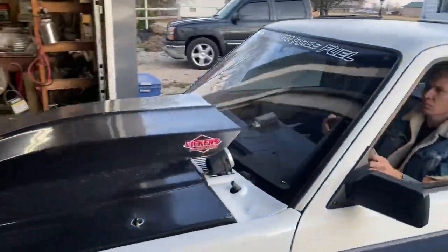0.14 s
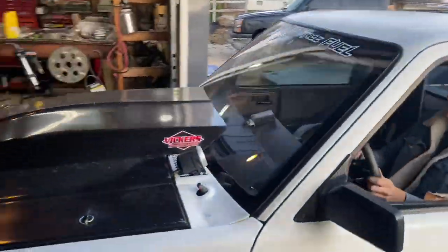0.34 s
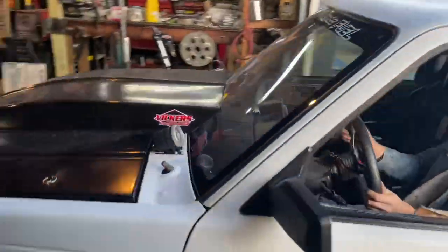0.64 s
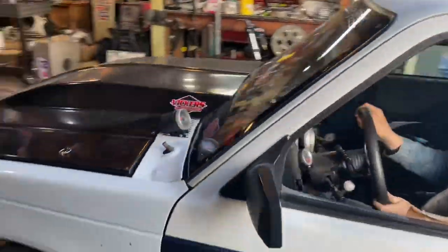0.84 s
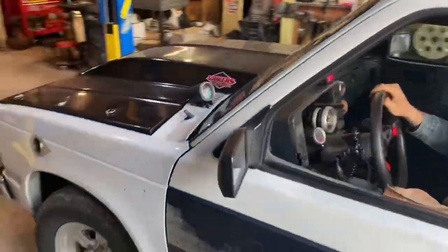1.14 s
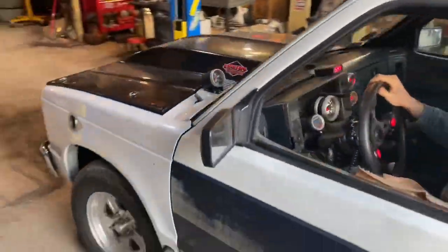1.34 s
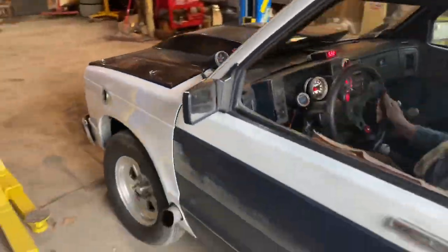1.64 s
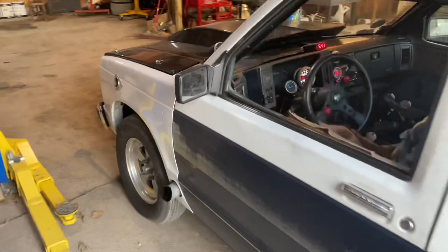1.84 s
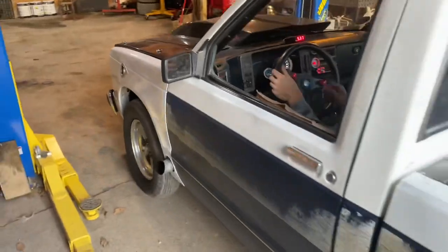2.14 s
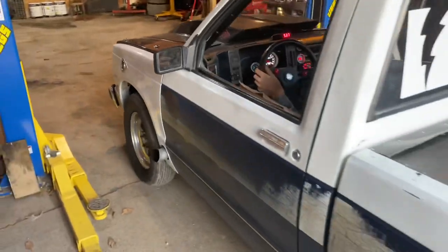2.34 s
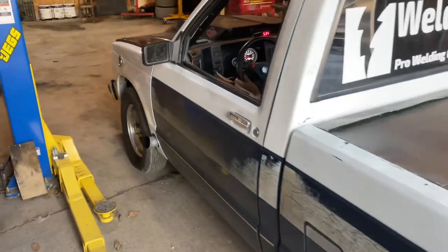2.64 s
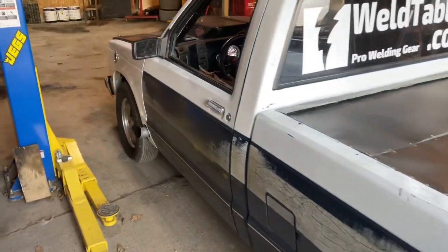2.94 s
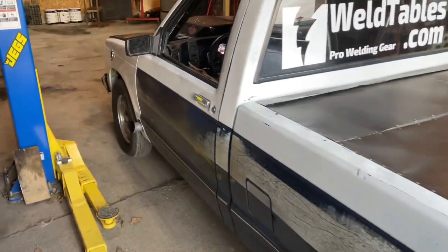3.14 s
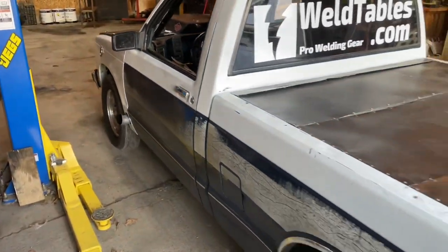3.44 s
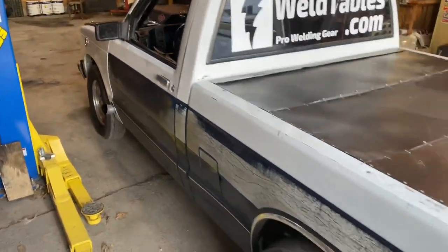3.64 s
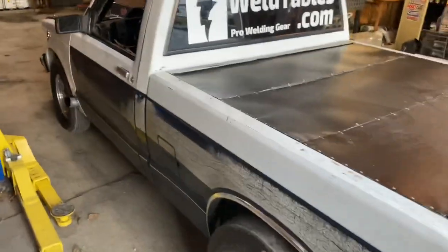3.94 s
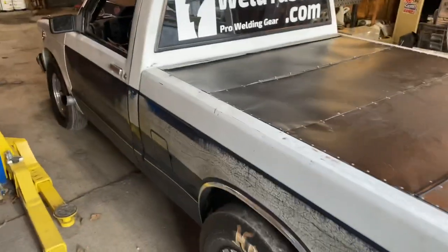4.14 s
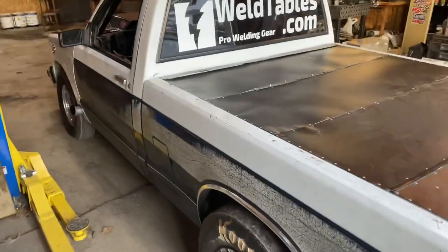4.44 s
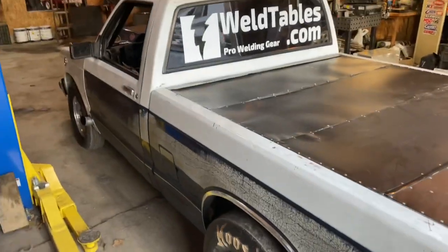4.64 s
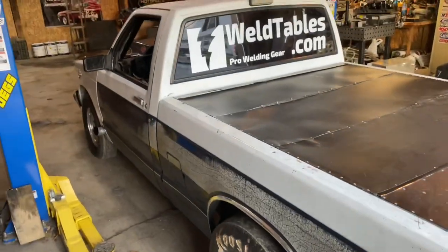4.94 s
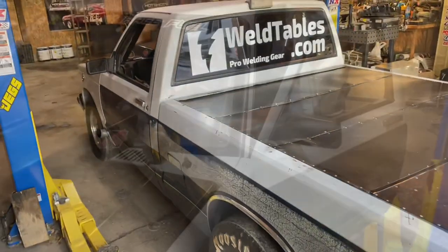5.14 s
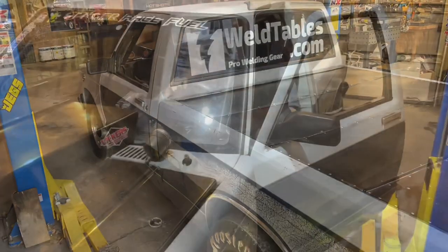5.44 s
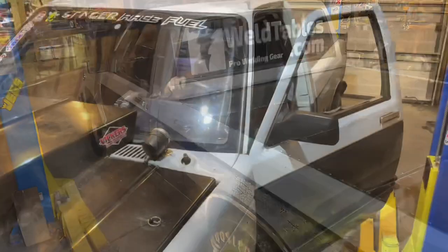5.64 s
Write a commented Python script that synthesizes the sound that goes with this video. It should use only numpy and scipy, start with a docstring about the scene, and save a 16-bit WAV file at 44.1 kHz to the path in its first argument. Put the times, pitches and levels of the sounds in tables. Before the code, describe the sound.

A tuned pickup's big engine idles with a loud, lumpy, uneven lope in a garage, crackling close by, then receding and fading out.

```python
"""A race V8 in a pickup truck lopes at about 1300 rpm inside a garage, then fades away.
Each firing is an impulse; shaped into puffs of gas, it rings pipe resonances for the drone and bark
and bursts of noise for the hiss. Cracks, pings, barks and ticks come at set times over a steady whir.
The near bank fires out of a short open pipe behind the front wheel; two of its cylinders catch in turns.
The microphone walks back along the truck, away from the pipe and into the sound of the room."""
import sys
import numpy as np
from scipy import signal
from scipy.fft import rfft, irfft
from scipy.io import wavfile
from scipy.ndimage import uniform_filter1d

SR = 44100
rng = np.random.default_rng(int(sys.argv[2]) if len(sys.argv) > 2 else 0)


def transcribe(u):
    """Save the signal u as a 16-bit wav file named by the first command-line argument.

    u: samples, shape (n,) or (channels, n), limited to [-1, 1]; the rate is SR.
    q: integer samples, one column per channel.
    """
    v = np.clip(np.atleast_2d(u).T, -1, 1)
    q = np.round(v * 32767).astype(np.int16)
    wavfile.write(sys.argv[1], SR, q)


N = 254898

# one throb of the lope is two turns of the crank, in which all eight cylinders fire
FIRST_THROB_S, THROB_S = -.054, .0928
# near bank in firing order: pressure/dB, bark/dB, spit/dB, swing/dB (up in one throb, down in the next)
NEAR_CYLINDERS = [(7.7, 5, 6.1, 1.5), (8.4, -2, 6, -0.26), (5.3, 2.5, 4.1, -3.5), (7, -1, 4.8, 5.5)]
# far bank, heard from under the truck: pressure/dB, bark/dB, spit/dB, swing/dB
FAR_CYLINDERS = [(-25, -1, 0, 1.4), (7, -6, -5, 0.93), (-18, -6, -5, 0.82), (-17, -12.5, -2.5, 0.19)]
# the idle hunts: t/s, lag of the crank behind an even speed/s
CRANK_DELAY = [(-0.05, 0.0006), (0.22, -0.0022), (0.41, 0.0013), (1.06, 0.0068), (1.25, 0.0011),
               (1.43, 0.0056), (1.71, 0.0011), (2.17, 0.006), (2.54, 0.0069), (2.73, 0.0039),
               (3.01, 0.0099), (3.75, 0.0067), (4.86, -0.0016), (5.42, 0.0027), (5.51, -0.0026),
               (5.7, 0.0012)]
# short changes in the strength of the firings, mostly stumbles: t/s, change/dB
STUMBLE_EVENTS = [(0.572, -24), (0.764, -21), (0.949, -8), (1.135, -5), (1.323, -12), (1.69, 1), (1.88, -4),
                  (2.065, -9), (2.435, -4.5), (2.806, -13), (2.995, -7), (3.18, 2), (3.368, -11),
                  (3.555, 3), (4.03, 2), (4.292, -3), (4.66, -3), (5.219, -12)]
# the walk: t/s, distance from the pipe mouth/m
WALK = [(0, 0.75), (.35, 0.94), (.8, 1), (1.5, 1.41), (2.3, 1.79), (3.4, 2.09), (4.3, 2.13), (5.8, 2.41)]
# share of the room as the pipe recedes, before each sound's own offset: t/s, level/dB
ROOM_SHARE = [(0, -3), (1.5, -2), (3, 2.5), (4.9, 1.5), (5.8, 1)]
# colour of gas tearing out of the pipe mouth: f/Hz, level per Hz/dB
JET_COLOUR = [(300, -12), (1200, 13), (2000, -3), (2400, 1.5), (3500, 2.5), (4600, -1), (5600, -6.5),
              (6200, 0), (8500, -0.5), (10500, 1.5), (12500, -3.5), (14500, -4), (16000, -15)]


def amp(db):
    """Decibels to gain."""
    return 10 ** (np.asarray(db) / 20)


def evened(x):
    """Scales a sound to rms 1."""
    return x / np.sqrt(np.mean(x ** 2) + 1e-20)


def read(points, hz):
    """Reads a table over log frequency."""
    f, value = np.transpose(points)
    return np.interp(np.log(hz + 1), np.log(f + 1), value)


def along(rows, axis=1):
    """Reads one column of a curve over time at every sample."""
    rows = np.asarray(rows)
    return np.interp(np.arange(N) / SR, rows[:, 0], rows[:, axis])


def cut(x, hz, kind, order=2):
    """Butterworth filter: keeps the part of a sound above (high) or below (low) a frequency."""
    return signal.sosfilt(signal.butter(order, hz, kind, fs=SR, output="sos"), x)


def colour(x, points):
    """Shapes the spectrum of a sound by a table of gains."""
    gain = amp(read(points, np.fft.rfftfreq(2 * N, 1 / SR)))
    return irfft(rfft(x, 2 * N) * gain)[..., :N]


def ring(x, modes):
    """Drives a set of damped resonances; the wider one is, the sooner it dies."""
    out = np.zeros(N)
    for hz, width, db in modes:
        r = np.exp(-np.pi * width / SR)
        pole = r * np.exp(2j * np.pi * hz / SR)
        out += amp(db) * signal.lfilter([1 - r], [1, -pole], x + 1e-18).real
    return out


def resonate(x, hz, width):
    """A resonance of gain 1 that follows a frequency curve."""
    turn = np.exp(2j * np.pi * np.cumsum(hz * np.ones(N)) / SR)
    r = np.exp(-np.pi * width / SR)
    # shift the note down to 0 Hz, smooth it there, shift it back
    return 2 * (turn * signal.lfilter([1 - r], [1, -r], x / turn + 1e-18)).real


def bumps(t, events, width):
    """Sums a short bell of dB around each event."""
    return sum(db * np.exp(-((t - s) / width) ** 2) for s, db in events)


def burst(s, rise):
    """Envelope of one blast: it peaks at 1 after the rise time, then dies away."""
    u = np.clip((np.arange(N) / SR - s) / rise, 0, 30)
    return u ** 2 * np.exp(2 - 2 * u)


def heat(spread):
    """Hot slugs of gas change the speed of sound and make notes waver: a random curve around 1."""
    step = SR // 25
    knots = np.arange(0, N + step, step)
    return np.interp(np.arange(N), knots, 1 + spread * rng.standard_normal(len(knots)))


def carried(level):
    """Gain of one voice at the microphone's distance: sound weakens as it spreads."""
    near_db, per_doubling_db = level
    return amp(near_db + per_doubling_db * np.log2(np.maximum(along(WALK), .1)))


def lope():
    """Strong and weak burns alternate: time/s, burn/dB and pop/dB of each firing, throbs x cylinders."""
    # eight even slots in a throb, shared unevenly: slot of each near cylinder, then each far one
    slots = [0, 2, 3, 5, 1, 4, 6, 7]
    # one firing stronger or weaker than usual: t/s, bark change/dB, spit change/dB
    pops = [(.038, -1.5, -4), (.074, -4, 7.5), (.165, 1, 2.5), (.222, -1.5, -2), (.316, 3, 4.5),
            (.352, 2, 2.5), (.411, 2, -1.5), (.471, 4.5, 0.5), (.505, 1, 4), (.540, -1.5, 3),
            (.692, 1, 3.5), (.845, 1.5, 3), (1.03, 4, 0.5), (1.156, 1.5, -3.5), (1.246, 6, -4),
            (1.399, -0.5, 1), (1.437, 0.5, 0), (1.528, 1.5, 1.5), (1.586, -1.5, -1), (1.768, -2, 4),
            (1.804, 6, 6.5), (1.933, 7.5, 8.5), (1.992, 4, 8), (2.215, 1.5, 2.5), (2.33, 3, 0),
            (2.40, -1.5, -8), (2.516, -5, 0.5), (2.887, 2.5, 4), (3.018, 1, -1), (3.261, -1, -0.5),
            (3.481, 4.5, 6), (3.515, 0, 1.5), (3.815, -1.5, 2.5), (4.0, -3, 3.5), (4.069, 1.5, 1.5),
            (4.368, 3.5, 1.5), (4.552, 3, 1.5), (4.702, 1.5, 3), (4.737, 2.5, 1), (4.805, -1.5, -3),
            (4.863, 2.5, -4), (4.921, 1, -0.5), (5.003, 8, 12), (5.108, -4, 0), (5.535, -16, 0)]
    cylinders = np.array(NEAR_CYLINDERS + FAR_CYLINDERS)
    turn = np.arange(int(N / SR / THROB_S) + 1)[:, None]
    even = FIRST_THROB_S + turn * THROB_S
    lag = np.interp(even, *np.transpose(CRANK_DELAY))
    times = even + lag + np.array(slots) * THROB_S / len(slots)
    pop_db = np.zeros(times.shape + (3,))
    for s, bark_db, spit_db in pops:
        miss = abs(times - s)
        # the nearest firing takes the change; its pressure follows the bark only a little
        pop_db[miss == miss.min()] = 0.091 * bark_db, bark_db, spit_db
    jitter_s, scatter_db = .0007, .8
    times = times + jitter_s * rng.standard_normal(times.shape)
    swing_db = -(-1) ** turn * cylinders[:, -1]
    burn_db = swing_db + scatter_db * rng.standard_normal(times.shape)
    return times, burn_db + bumps(times, STUMBLE_EVENTS, width=.014), pop_db


def firings(burns, axis, follow, scatter_db):
    """One impulse train a cylinder; follow says how far a layer obeys the strength of the burn."""
    times, burn_db, pop_db = burns
    cylinders = np.array(NEAR_CYLINDERS + FAR_CYLINDERS)
    scatter = scatter_db * rng.standard_normal(burn_db.shape)
    size = amp(cylinders[:, axis] + follow * burn_db + pop_db[..., axis] + scatter)
    at = np.round(times * SR).astype(int)
    size = size * ((at >= 0) & (at < N))
    return np.array([np.bincount(a, s, N) for a, s in zip(at.T.clip(0, N - 1), size.T)])


def puffs(train, rise, fall):
    """Each impulse becomes a blow-down: a quick rise of flow and a slower fall (times in s)."""
    decay = signal.lfilter([1], [1, -np.exp(-1 / (fall * SR))], train + 1e-12)
    r = np.exp(-1 / (rise * SR))
    return signal.lfilter([1 - r], [1, -r], decay)


def boom(burns):
    """Pressure pulses thump under the truck and keep the pipe droning; one bank's uneven order lopes."""
    # resonance of the gap under the truck: f/Hz, width/Hz, level/dB
    thump_modes = [(61, 14, 4)]
    # level of the thump, which fills the garage unevenly: t/s, level/dB
    thump_db = [(0, -14.5), (.8, -19.5), (1.9, -19.5), (2.7, -22), (4.5, -22.5), (5.3, -22), (5.8, -25)]
    # two low standing waves of the garage: f/Hz, width of one pass/Hz, level/dB
    hum_modes = [(87.7, 10.5, 0), (96.5, 25.5, 0)]
    # their level along the walk: t/s, lower/dB, upper/dB
    hum_db = [(0, -19, -46), (.7, -24, -20), (1.3, -26, -36), (2.4, -36, -67), (3.2, -23, -77),
              (4, -32, -30), (4.7, -33.5, -23), (5.8, -28, -30)]
    # low resonances of the pipe, with the gap under the truck: f/Hz, width/Hz, level/dB
    boom_modes = [(115, 21, 14), (134.4, 29, 22.5)]
    # level of the drone's two notes, which fill the garage unevenly: t/s, lower/dB, upper/dB
    drone_db = [(0, -17, -14.5), (.7, -13, -18), (1.3, -11, -15.5), (2, -20.5, -16), (2.6, -16, -19.5),
                (3.2, -19, -18.5), (3.9, -23, -18.5), (4.6, -24, -21), (5.8, -20.5, -27.5)]
    # how much of the drone is two clean notes: t/s, share of the power/0-1
    drone_clean = [(0, 0.9), (.8, 0.5), (2.2, 0.82), (3.4, 0.67), (4.5, 0.33), (5.8, 0.1)]
    t = np.arange(N) / SR
    # the bass sags just after each stumble
    sag = amp(.9 * bumps(t - .012, STUMBLE_EVENTS, width=.017))

    push = puffs(firings(burns, axis=0, follow=.4, scatter_db=1.2).sum(0), rise=.0006, fall=.002)
    thump = cut(cut(ring(push, thump_modes), 41.0, "high", order=4), 64, "low", order=4)
    thump = garage(thump * sag, wet_db=-10) * amp(along(thump_db))

    hum = np.zeros(N)
    for k, mode in enumerate(hum_modes):
        wave = cut(ring(ring(push, [mode]), [mode]), 166, "low")
        hum += evened(wave) * amp(along(hum_db, axis=k + 1))

    flow = puffs(firings(burns, axis=0, follow=0.54, scatter_db=3.35).sum(0), rise=0.00081, fall=0.0014)
    rung = cut(cut(ring(flow, boom_modes), 122.6, "high", order=4), 119.0, "low", order=3)
    # the drone arrives later and later as its reflections take over
    lag_s_per_m = 0.0076
    sent = t - lag_s_per_m * (along(WALK) - 1)
    rung = garage(np.interp(sent, t, rung) * sag, wet_db=-17)
    lower = colour(rung, [(122, 0), (136, -20)])
    clean = np.clip(along(drone_clean), 0, 1)
    drone = 0
    for k, (part, note) in enumerate(zip([lower, rung - lower], beating(sent))):
        mixed = np.sqrt(1 - clean) * evened(part) + np.sqrt(clean) * note * sag
        drone = drone + evened(mixed) * amp(along(drone_db, axis=k + 1))
    return thump + hum * sag + drone


def beating(t):
    """The drone's two clean notes follow the crank and beat together, swelling twice a throb."""
    # lower and upper note: cycles per throb
    orders = (11, 13)
    swell_after_s = 0.01694
    turns = (t - along(CRANK_DELAY) - FIRST_THROB_S - swell_after_s) / THROB_S
    sway, drift = heat(.12), heat(.3)
    return [np.sqrt(2) * sway * np.cos(2 * np.pi * order * turns + drift) for order in orders]


def bark(burns):
    """The steep front of each blast and its turbulence ring a header tube, then the pipe."""
    # header tubes in firing order, near bank then far bank: f/Hz, width/Hz, level/dB
    headers = [(1040, 130, 9.0), (1020, 680, 11), (700, 87, 17.5), (1090, 240, 1)] + [(840, 570, 7.5)] * 4
    # resonances of the pipe, around which the notes waver: f/Hz, width/Hz, level/dB
    pipe_modes = [(161, 140, -20.5), (207.8, 32.6, 1), (260.3, 50, -6.5), (371.8, 25.7, -3),
                  (422.8, 55, 0.5), (561, 100, -1), (751, 76, -5), (879, 62, 2), (1004, 45, -4.5),
                  (1072, 79, -8.5), (1399, 54, -5.5), (1715, 310, -15)]
    # change of the body around 200 and around 340 Hz: t/s, lower/dB, upper/dB
    body_db = [(0, 2, 2), (.7, -11.5, -1.5), (1.5, -5, 1.5), (2.6, 3.5, -3.5), (3.6, 1, -2.5),
               (4.6, -0.5, -2), (5.8, 1, 2)]
    # body of the note: level at 1 m/dB, change per doubling of distance/dB
    body_level = (-14.5, -7)
    # level of the rasp along the walk: t/s, level/dB
    rasp_db = [(0, -21), (.8, -23), (1.3, -24.5), (1.8, -25), (2.4, -23), (3.4, -24), (4.4, -26),
               (5.2, -24.5), (5.8, -25.5)]
    collector = np.zeros(N)
    for train, header in zip(firings(burns, axis=1, follow=0.88, scatter_db=.7), headers):
        swirl = puffs(train, rise=.0004, fall=.006) * rng.standard_normal(N)
        blast = train + amp(-24) * swirl
        collector += blast + ring(blast, [header])
    collector = cut(collector, 5000, "low", order=1)
    waver = heat(.028)
    pipe = sum(amp(db) * resonate(collector, hz * waver, width) for hz, width, db in pipe_modes)

    body = cut(cut(pipe, 479, "low", order=7), 167, "high", order=4)
    # the upper body of the note carries less far than the lower
    upper = colour(body, [(290, -3), (370, 4.0)])
    body = evened(body + upper * (amp(-.7 * (along(ROOM_SHARE) + 5.0)) - 1))
    # level out slow changes over one second
    body = body / np.sqrt(uniform_filter1d(body ** 2, size=SR))
    for k, hz in enumerate([200, 340]):
        band = colour(body, [(.65 * hz, -40), (.87 * hz, 0), (1.13 * hz, 0), (1.4 * hz, -40)])
        body = body + band * (amp(along(body_db, axis=k + 1)) - 1)

    rasp = cut(cut(pipe, 670, "high", order=4), 2470, "low", order=3)
    body = garage(body, wet_db=-7.0) * carried(body_level)
    return body + garage(rasp, wet_db=1.5) * amp(along(rasp_db))


def throat(burns):
    """Each near-bank blast rings one throaty note, which climbs past the front wheel, then sinks."""
    # ring of the wheel well and the truck's flank, around which the note wavers: t/s, f/Hz, level/dB
    wheel_well = [(0, 876, -24.5), (.6, 938, -31), (1.0, 995, -27.5), (1.25, 1115, -36.5), (1.6, 1133, -29),
                  (1.9, 1240, -38), (2.15, 1290, -34.5), (2.9, 1446, -36), (3.8, 1140, -47),
                  (4.3, 1060, -41), (4.75, 1066, -29.5), (5.3, 915, -29), (5.8, 1000, -32)]
    trains = firings(burns, axis=1, follow=.8, scatter_db=.5)
    blasts = trains[:len(NEAR_CYLINDERS)].sum(0)
    hz = along(wheel_well) * heat(.035)
    note = resonate(resonate(blasts, hz, width=31), hz, width=90)
    return garage(cut(note, 670, "high"), wet_db=-9.0) * amp(along(wheel_well, axis=2))


def spit(burns):
    """The jet at the pipe mouth hisses in bursts of noise, with tiny shocks crackling in it."""
    # treble beams out of the pipe mouth, so the hiss is duller in front of it: t/s, treble level/dB
    beam = [(0, -1.5), (.7, 0.5), (1.5, 1.5), (3.3, 3), (4.5, 2.5), (5.8, 3)]
    # hiss: level at 1 m/dB, change per doubling of distance/dB
    spit_level = (-23, -8)
    blasts = firings(burns, axis=2, follow=1.0, scatter_db=.8).sum(0)
    flow = puffs(blasts, rise=0.002, fall=0.0069)
    # about 1500 shocks a second
    shocks = (rng.random(N) < 1500 / SR) * rng.standard_normal(N)
    hiss = rng.standard_normal(N) + amp(-9) * evened(shocks)
    jet = colour(flow * hiss, JET_COLOUR)
    # eddies colour each burst differently
    z = signal.stft(jet, nperseg=256)[2]
    eddies = uniform_filter1d(rng.standard_normal(z.shape), size=5, axis=0)
    eddies = evened(uniform_filter1d(eddies, size=8, axis=1))
    jet = signal.istft(z * amp(2.4 * eddies), nperseg=256)[1][:N]
    dull = colour(jet, [(4000, 6.5), (5200, -4), (7000, -59)])
    beamed = dull + amp(along(beam)) * (jet - dull)
    return garage(beamed, wet_db=-9.0) * carried(spit_level)


def snarl(burns):
    """The two cylinders that catch in turns each tear off a raspy puff of noise with short notes in it."""
    # notes in the puffs, around which they waver: f/Hz
    snarl_hz = [1447, 1689]
    # level of the puffs, which come through beside the cab: t/s, level/dB
    snarl_db = [(0, -46), (.9, -36), (1.6, -33), (2.3, -36), (3.5, -34.5), (5.8, -34)]
    blasts = firings(burns, axis=1, follow=1.0, scatter_db=1)[2:4].sum(0)
    puff = puffs(blasts, rise=0.0019, fall=0.017) * rng.standard_normal(N)
    notes = sum(resonate(puff, hz * heat(.07), width=70) for hz in snarl_hz)
    voice = cut(cut(notes + amp(-6) * puff, 920, "high", order=4), 2100, "low", order=4)
    return garage(voice, wet_db=-4.5) * amp(along(snarl_db))


def knock(burns):
    """Each time the third cylinder catches, it rings a hollow two-note knock."""
    # hollow notes under the cab: f/Hz, width/Hz, level before the filters/dB
    knock_modes = [(597, 15, 13.5), (748, 34, 5.5)]
    # their level as the microphone passes the cab: t/s, level/dB
    knock_db = [(0, -66), (1.2, -33.5), (1.8, -29.5), (2.9, -29), (3.6, -33), (4.3, -37), (4.8, -39),
                (5.2, -46), (5.8, -64)]
    third = firings(burns, axis=1, follow=.9, scatter_db=.4)[2]
    hollow = cut(cut(ring(third, knock_modes), 630, "high", order=3), 1010, "low", order=3)
    return garage(hollow, wet_db=-8.5) * amp(along(knock_db))


def hard_knocks():
    """Now and then a hollow note rings out alone, as a short swelling sine."""
    # the hardest hollow knocks: t/s, f/Hz, level/dB
    knock_events = [(1.838, 595, -19), (2.018, 778, -21), (2.212, 747, -25), (2.765, 604, -28),
                    (2.955, 750, -20), (3.143, 590, -20), (3.883, 770, -25), (4.25, 614, -29),
                    (4.615, 750, -29), (4.80, 740, -26)]
    t, out = np.arange(N) / SR, np.zeros(N)
    for s, hz, db in knock_events:
        out += amp(db) * burst(s, rise=0.011) * np.sin(2 * np.pi * hz * (t - s))
    # the garage evens the level, so put it back
    return garage(out, wet_db=-16) * np.std(out)


def pings():
    """Hard blasts that ring the wheel well: short, nearly pure sines, slightly roughened."""
    # pings: t/s, f/Hz, level/dB
    ping_events = [(0.22, 945, -12), (.542, 1000, -15), (.598, 955, -7.5), (.879, 980, -29),
                   (.973, 970, -14), (1.157, 1026, -10), (1.196, 1090, -9), (1.214, 1110, -11),
                   (1.248, 1104, -12.5), (1.269, 1080, -12.5), (1.286, 1130, -16), (1.340, 1070, -12.5),
                   (1.363, 1070, -16), (1.399, 1060, -10), (1.417, 1100, -19), (1.436, 1180, -14),
                   (1.48, 1180, -23), (1.529, 1070, -12), (1.5632, 1186, -15), (1.5843, 1080, -12.5),
                   (1.619, 1146, -13.5), (1.6412, 1090, -17), (1.709, 1060, -12), (1.73, 1080, -16),
                   (1.769, 1110, -14.5), (1.802, 1210, -16), (1.898, 1220, -13.5), (1.934, 1200, -22),
                   (1.953, 1210, -20), (1.9876, 1230, -22), (3.018, 990, -17), (4.702, 1056, -16),
                   (4.738, 1040, -21), (4.863, 1050, -25), (5.001, 1040, -31)]
    t, out = np.arange(N) / SR, np.zeros(N)
    for s, hz, db in ping_events:
        out += amp(db) * burst(s, rise=0.0036) * np.sin(2 * np.pi * hz * (t - s))
    out = out * (1 + 0.12 * evened(cut(rng.standard_normal(N), 420, "low")))
    return garage(out, wet_db=-3) * np.std(out)


def rasps():
    """Brief tearing barks heard beside the cab: sines around their own pitch, with a random flutter."""
    # barks: t/s, f/Hz, level/dB
    rasp_events = [(2.2156, 2100, -26), (2.2739, 1300, -26), (2.404, 1480, -20.5), (2.589, 1480, -21),
                   (2.665, 1590, -27), (2.7359, 1340, -22), (2.7568, 1420, -22), (2.889, 1686, -20),
                   (2.9601, 1776, -21), (3.234, 1470, -22), (3.33, 1780, -27), (3.445, 1477, -20.5),
                   (3.699, 1630, -31), (3.887, 1390, -23.5), (4.3697, 1470, -27), (4.623, 1700, -24),
                   (5.0017, 1550, -20)]
    t, out = np.arange(N) / SR, np.zeros(N)
    flutter = evened(cut(rng.standard_normal(N), 355, "low"))
    for s, hz, db in rasp_events:
        out += amp(db) * burst(s, rise=0.006) * np.sin(2 * np.pi * hz * (t - s) + 0.42 * flutter)
    return garage(out, wet_db=-16.5) * np.std(out)


def cracks():
    """Close to the pipe mouth, sharp, bright cracks: very short bursts of the jet's treble noise."""
    # cracks: t/s, level/dB
    crack_events = [(.131, -25.5), (.317, -17.5), (.354, -13), (.413, -20), (.470, -13.5), (.5055, -18),
                    (.541, -15), (.6365, -15), (.658, -13.5), (.694, -15), (.716, -23), (.997, -28),
                    (1.066, -25)]
    jet = evened(cut(colour(rng.standard_normal(N), JET_COLOUR), 6200, "high"))
    out = jet * sum(amp(db) * burst(s, rise=.0024) for s, db in crack_events)
    return garage(out, wet_db=-15) * np.std(out)


def ticks():
    """A few short rings of metal, nearly lost in the exhaust: sines that die away at once."""
    # small metallic ticks: t/s, f/Hz, level/dB
    tick_events = [(.135, 5850, -24), (.28, 5470, -23), (.355, 3030, -21), (.658, 5200, -24),
                   (.997, 3670, -25), (1.843, 2520, -29), (2.402, 4450, -27.5), (3.516, 4620, -29),
                   (4.263, 4570, -30)]
    decay_s, out = .012, np.zeros(N)
    for s, hz, db in tick_events:
        t = np.maximum(np.arange(N) / SR - s, 0)
        out += amp(db) * np.sin(2 * np.pi * hz * t) * np.exp(-t / decay_s)
    return out


def whir():
    """Fan, belts and valve gear keep up a fine, steady hiss: coloured noise."""
    # hiss of the engine bay: f/Hz, level per Hz/dB
    whir_colour = [(1200, -16), (2000, 1), (3200, 3), (4500, -2), (6500, 0), (8500, -27), (11000, -1),
                   (16000, -9)]
    # its level along the walk: t/s, level/dB
    whir_db = [(0, -31), (2, -35), (4, -40), (5.8, -40)]
    return garage(colour(rng.standard_normal(N), whir_colour), wet_db=-6.5) * amp(along(whir_db))


def garage(x, wet_db):
    """Direct sound plus diffuse, dying noise tails that change along the walk; left and right, rms 1."""
    # how fast the room dies away: f/Hz, time to fall by 60 dB/s
    decay_times = [(60, 1), (250, 0.98), (1000, 0.31), (4000, 0.4), (15000, 0.0044)]
    count, size = 16, 16384
    hz, t = np.fft.rfftfreq(256, 1 / SR), np.arange(size // 128 + 1) * 128 / SR
    real, imag = rng.standard_normal((2, count, 2, len(hz), len(t)))
    decay = amp(-60 * t / read(decay_times, hz)[:, None])
    tails = signal.istft((real + 1j * imag) * decay, SR, nperseg=256)[1]
    # no reflection in the first 5 ms
    tails = tails * (np.arange(size) > .005 * SR)
    # overlapping stretches of sound each get their own tail, so the room blends from one to the next
    step = N // (count - 1) + 1
    padded, room = np.pad(x, (step, 2 * step)), np.zeros((2, N + 3 * step + size))
    for k, tail in enumerate(tails):
        feed = padded[k * step:(k + 2) * step] * signal.windows.cosine(2 * step)
        echo = signal.fftconvolve(feed[None], tail / np.linalg.norm(tail[0]), axes=1)
        room[:, k * step:k * step + echo.shape[1]] += echo
    wet = amp(along(ROOM_SHARE) + wet_db)
    return evened((x + wet * room[:, step:step + N]) / np.sqrt(1 + wet ** 2))


def scene():
    """The exhaust and engine as they reach the two microphone ports, which differ in level and phase."""
    # closing fade, which holds its first level until it starts: t/s, level/dB
    fade = [(4.75, -2), (5.15, -4), (5.25, -5), (5.55, -10.5), (5.65, -14), (5.78, -18.5)]
    # gain of the difference between the ports: f/Hz, level/dB
    width = [(50, -12), (130, -7), (300, -4), (1000, 1), (4000, 3), (6000, 0), (8000, -4), (12000, -7),
             (16000, -14)]
    # how far left leads right: f/Hz, phase/radians
    lead = [(20, 0), (130, .05), (600, .45), (1300, .3), (3000, .9), (4900, .9), (6000, 1.5), (7000, 2.0),
            (8600, 3.14), (10000, 4.2), (11400, 4.75), (12500, 5.6), (13300, 6.23), (16000, 6.28)]
    # left minus right: f/Hz, level/dB
    balance_db = [(50, .3), (125, 0), (250, 2), (500, 4), (1000, 5), (2000, 3.6), (4500, 4.5), (6500, 3),
                  (8000, 0), (16000, 0)]
    burns = lope()
    exhaust = boom(burns) + bark(burns) + throat(burns) + spit(burns) + snarl(burns) + knock(burns)
    exhaust = exhaust + hard_knocks() + pings() + rasps() + cracks() + ticks() + whir()
    left, right = rfft(exhaust * amp(along(fade)), 2 * N)
    hz = np.fft.rfftfreq(2 * N, 1 / SR)
    mid = (left + right) / 2
    side = (left - right) / 2 * amp(read(width, hz))
    tilt = amp(read(balance_db, hz) / 2)
    left = (mid + side) * tilt
    right = (mid - side) / tilt * np.exp(-1j * read(lead, hz))
    return irfft([left, right])[:, :N]


def record(dry):
    """The highest peaks are rounded off; then a low-pass limits the band."""
    rounded = dry / (1 + dry ** 6) ** (1 / 6)
    edge_hz = 16100
    lowpass = signal.firwin(511, edge_hz, window=("kaiser", 9), fs=SR)
    return signal.oaconvolve(rounded, lowpass[None], "same")


dry = scene()
out = record(dry)
transcribe(out)
```